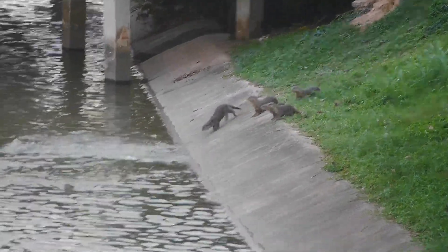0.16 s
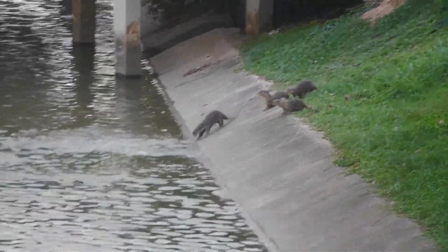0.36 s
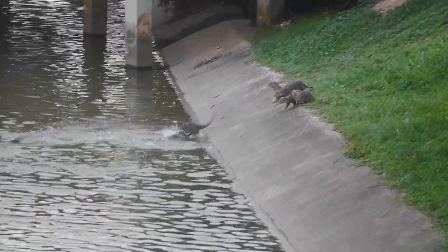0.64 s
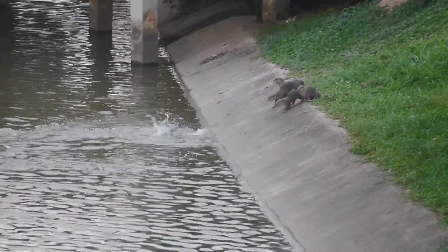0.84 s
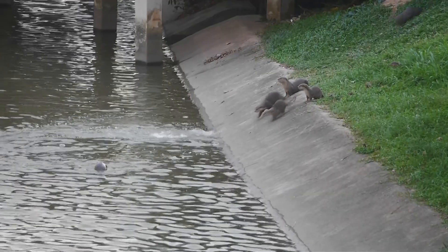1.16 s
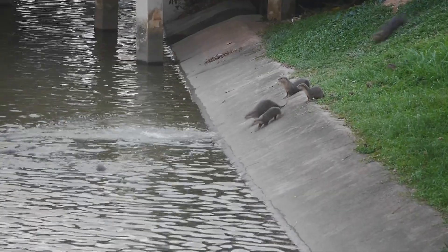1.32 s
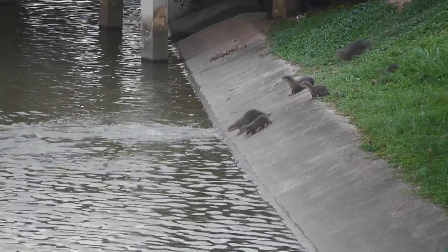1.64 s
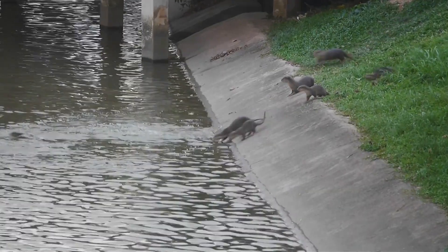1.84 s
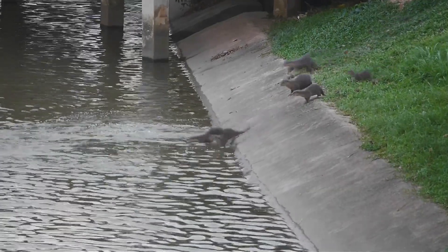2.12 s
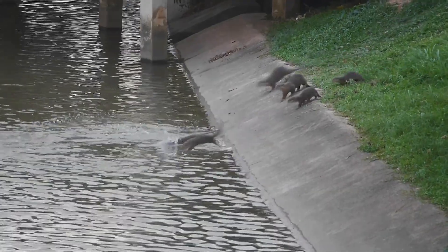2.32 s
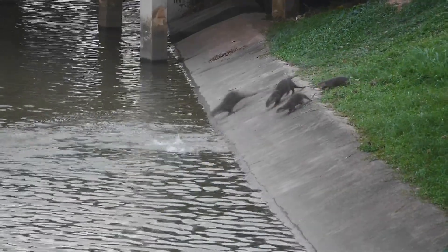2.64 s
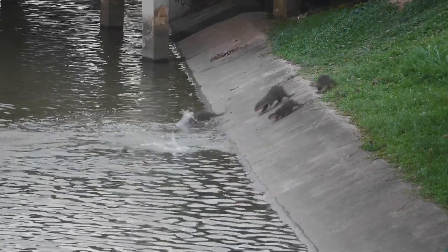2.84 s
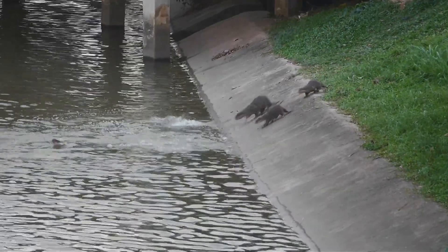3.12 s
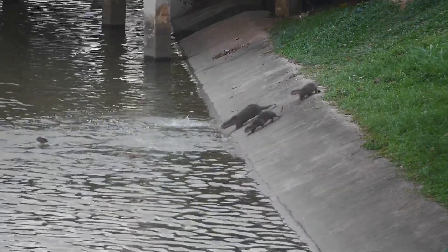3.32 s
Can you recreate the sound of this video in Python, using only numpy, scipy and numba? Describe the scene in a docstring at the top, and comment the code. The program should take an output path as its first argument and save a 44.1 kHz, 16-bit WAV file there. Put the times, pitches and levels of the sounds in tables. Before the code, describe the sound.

Otters squeak in brief, high arched whistles some way off on a canal bank, sparse at first and busier near the end, with slight echo; wind gusts thump the microphone over steady traffic and faint water hiss.

```python
"""Otters squeaking on a canal bank

Otters squeak some way off: thin arched whistles with an octave overtone, made of gliding sine waves, and a short echo.
Shaped noise makes the distant traffic, the fizz of stirred water and a faint rasping insect; short tones make plops.
Gusts of shaped noise buffet two microphone ports, with thumps and crackles in the strongest.
The recorder's gain control turns everything down under loud gusts and recovers slowly."""
import sys
import numpy as np
from scipy import signal
from scipy.fft import rfft, irfft
from scipy.io import wavfile
from scipy.ndimage import uniform_filter1d
from numba import njit

SR = 44100
rng = np.random.default_rng(int(sys.argv[2]) if len(sys.argv) > 2 else 0)


def inscribe(sig):
    """Save sig as 16-bit PCM at rate SR to the path in sys.argv[1].

    A 1-D sig is mono; a 2-D sig holds one channel per row.
    Samples are clipped to [-1, 1] before scaling.
    """
    pcm = np.round(np.clip(np.atleast_2d(sig).T, -1, 1) * 32767)
    wavfile.write(sys.argv[1], SR, pcm.astype(np.int16))


N = 153027  # length in samples

# All levels are set ahead of the recorder's gain control. Spectra give only the shape of a sound.
# Pan is left minus right in dB; phase is how far left leads right, in radians.
# Coherence is the share of power common to both ports, 0-1.

# Traffic spectrum: f/Hz, level/dB
TRAFFIC_SPECTRUM = [(30, -42), (60, -29), (120, -14), (200, -7), (340, -6), (450, -5), (600, -2), (730, 0),
                    (1000, -1.5), (1400, -8), (2000, -14.5), (3000, -24)]
# How alike the traffic is at the two ports: f/Hz, coherence [0-1]
TRAFFIC_COHERENCE = [(100, 0.29), (350, 0.4), (700, 1), (1050, 0.58), (1600, 0.81), (3000, 0.41)]
TRAFFIC_DB, TRAFFIC_PAN_DB, TRAFFIC_PHASE = -24, 1, 0.38

# Stirred water spectrum: f/Hz, level/dB
WATER_SPECTRUM = [(1200, -33), (2800, 0), (4000, -1.5), (6000, -5.5), (7500, -10.5), (8700, -12.5),
                  (9500, -4.5), (10150, -6), (11200, -13.5), (12500, -20), (15500, -29)]
# Rise and fall of the water, before its flicker: t/s, level/dB
WATER_LEVEL = [(0, -41.5), (.35, -40.5), (.7, -43.5), (1.05, -39.5), (1.45, -39.5), (1.9, -43), (2.2, -42),
               (2.45, -40), (2.8, -43), (3.46, -39)]
WATER_PAN_DB, WATER_PHASE, WATER_COHERENCE, WATER_FLICKER_DB = -1.5, 0.78, 0.59, 1.1
# Droplets: average count, mean extra level, level of all droplets against the hiss, decay time
DROPS_PER_S, DROP_SPREAD_DB, DROP_DB, DROP_DECAY_S = 900, 2.2, -9, 0.0005

# Insect rasps: start t/s, length/s
RASPS = [(1.02, .55), (2.02, .48)]
# Insect spectrum: f/Hz, level/dB
INSECT_SPECTRUM = [(11300, -30), (12150, -4), (12400, 0), (12700, -4), (13400, -28)]
INSECT_DB, RASP_FADE_S = -62, 0.06

# Small plops in the canal: start t/s, pitch f/Hz, level/dB before the low cut
PLOPS = [(.330, 780, -6.5), (.336, 800, -10), (1.889, 680, -10)]
PLOP_DECAY_S, PLOP_PHASE, PLOP_LOW_CUT_HZ = 0.0007, 0.5, 350

# Strength of the wind on the ports, before buffeting: t/s, level/dB
GUSTS = [(0.0, -75), (0.1, -52), (0.18, -32), (0.2, -56), (0.34, -38.5), (0.37, -51), (0.45, -30),
         (0.48, -41), (0.54, -25), (0.66, -20), (0.81, -16), (0.82, -27.5), (0.86, -17), (0.95, -21.5),
         (1.05, -39.5), (1.94, -49.5), (1.975, -23), (2.12, -23.5), (2.14, -34), (2.155, -20.5),
         (2.19, -21.5), (2.21, -22), (2.24, -33), (2.27, -21.5), (2.32, -32.5), (2.45, -41), (2.53, -12.5),
         (2.59, -18), (2.81, -17), (2.89, -25.5), (2.91, -19.5), (3.1, -18), (3.18, -32), (3.23, -23.5),
         (3.25, -28.5), (3.32, -18), (3.39, -34), (3.41, -28.5), (3.46, -19)]
BUFFET_DB, BUFFET_RATE_HZ = 1.3, 70
# Phase between the ports for wind: f/Hz, left lead [rad]
WIND_PHASE = [(60, 1.6), (170, 0.84), (340, 1.45), (700, 2.48), (2200, 2.49)]
# Roar spectrum: f/Hz, level/dB
ROAR_SPECTRUM = [(30, -60), (60, -79), (100, -32), (150, -28.5), (260, -9), (400, -0.5), (520, -0.5),
                 (680, -7), (900, -17.5), (1400, -25), (2300, -35.5), (3500, -58)]
# The roar's level is added to the gust strength
ROAR_DB, WIND_PAN_DB, WIND_COHERENCE = 8, 2.5, 0.98
# Light-air rumble spectrum: f/Hz, level/dB
BREEZE_SPECTRUM = [(30, -52), (60, -43), (120, -18), (200, -1), (290, 2.5), (420, -19), (700, -11)]
# Change in the rumble beyond what the gusts give it: t/s, level/dB
RUMBLE_CHANGE = [(0, 0), (.5, 0.5), (.7, -3), (1.05, 0), (1.92, -2.5), (1.97, 6), (2.2, 4.5), (2.45, 0.5),
                 (2.8, -1), (3.46, -2.5)]
# Rough upper band torn off by strong gusts: f/Hz, level/dB
TEAR_SPECTRUM = [(300, -39), (700, 7.5), (1200, -4), (2000, -5.5), (3500, -18), (6000, -54), (15000, -47)]
# Rumble and tear levels apply at this reference gust strength; growth is dB per dB of gust
GUST_REF_DB = -30.5
BREEZE_DB, BREEZE_GROWTH, BREEZE_PAN_DB, BREEZE_COHERENCE = -33, 0.35, 8, 0.19
TEAR_DB, TEAR_GROWTH, TEAR_PAN_DB = -36, 1.25, -1.8
TEAR_ROUGH_DB, TEAR_RATE_HZ = 2.3, 160
# Single eddies that thump the ports: centre t/s, peak level/dB before the treble cut and pan
THUMPS = [(.7155, 0), (1.9595, -7), (1.982, -3), (2.151, 2), (2.204, 2), (2.5348, 3), (2.6247, 9),
          (2.66, -1), (2.7252, 2), (2.905, 1)]
THUMP_HZ, THUMP_TOP_HZ = 520, 3000

# Sharp crackles in the strongest gusts: start t/s, starting level/dB
CRACKLES = [(.547, -19), (.59, -25), (.637, -22), (.783, -22), (.794, -20), (.806, -20), (2.535, -13),
            (2.612, -19), (2.6243, -14), (2.7245, -18)]
# Crackle spectrum: f/Hz, level/dB
CRACKLE_SPECTRUM = [(500, -30), (1200, 0), (2000, -1), (3200, -7), (6000, -20)]
CRACKLE_DECAY_S = 0.0025

# Otter squeaks: start t/s, rise/s, hold/s, fall/s, start f/Hz, top f/Hz, end of hold f/Hz, end f/Hz,
# level/dB (at the top pitch), overtone level/dB (against the whistle, before its fade with pitch),
# swell with pitch [dB per octave], roughness [0-1], echo level/dB (against the squeak)
SQUEAKS = [ (-.04, .02, .025, .045, 5200, 6000, 5950, 4100, -40, -15, 10, .6, -9),
           (.243, .024, .005, .048, 3100, 4400, 4350, 3100, -47, -24, 8, .8, -7),
           (.835, .008, .062, .06, 6600, 6650, 6600, 3800, -41, -14, 14, 1, -6),
           (1.217, .039, .006, .066, 3500, 5550, 5450, 3000, -50, -12, -8, .8, -10),
           (1.575, .062, .002, .05, 6000, 7520, 7480, 6300, -36.5, -22, 42, .8, -7),
           (1.578, .005, .09, .018, 6250, 6280, 6020, 5400, -40.5, -12, 70, .2, -11),
           (1.655, .005, .025, .045, 7300, 7300, 6600, 4000, -45, -4, 3, .8, -9),
           (1.885, .03, .003, .035, 3700, 4900, 4880, 3600, -43, -16, 10, 1, -8),
           (2.42, .03, .012, .025, 4300, 4850, 4830, 4500, -45.5, -19, 12, 1, -9),
           (2.425, .024, .006, .022, 5400, 6100, 6080, 5500, -50.5, -20, 12, .6, -9),
           (2.521, .035, .002, .04, 2900, 4980, 4960, 3200, -32.5, -27, 19, .6, -12),
           (2.538, .021, .003, .028, 2900, 4300, 4280, 2900, -41, -32, 0, .6, -12),
           (2.96, .018, .006, .022, 6100, 6850, 6800, 6400, -42.5, -25, 10, .8, -9),
           (2.987, .005, .04, .066, 6430, 6430, 6330, 3000, -37, -27, 15, 1, -2),
           (3.115, .012, .035, .04, 7000, 7450, 7100, 5900, -46.5, -9, 14, .9, -6),
           (3.148, .037, .005, .032, 5200, 6050, 6020, 3500, -44.5, -22, -5, .9, -10),
           (3.215, .034, .015, .03, 6600, 8250, 8120, 7400, -42.5, -25, 45, .9, -9),
           (3.29, .01, .008, .044, 6700, 6750, 6550, 3800, -51, -14, -8, .9, -10)]
FALL_CURVE = 1.7  # the drop in pitch steepens as this power of time
# Size and rate of the wobbles at full roughness
WAVER_FRACTION, WAVER_RATE_HZ, FLUTTER_DB, FLUTTER_RATE_HZ = 0.014, 600, 3.2, 230
OVERTONE_FADE_DB_PER_KHZ, OVERTONE_REF_HZ = 3.5, 11000  # the overtone weakens as its pitch climbs
ATTACK_S, RELEASE_S = 0.009, 0.01
OTTER_PAN_DB, OTTER_PHASE = -1.4, 0.35
ECHO_T60_S, ECHO_DELAY_S = 0.58, 0.012  # time to sink by 60 dB, wait before the echo

# Gain control: threshold, ratio, how fast it reacts and recovers, loudness it starts from
LIMIT_DB, LIMIT_RATIO, LIMIT_ATTACK_S, LIMIT_RELEASE_S = -25, 1.56, 0.011, 0.49
LIMIT_START_DB = -10.5
TOP_HZ = 15700


def undb(db):
    """Turn decibels into a gain."""
    return 10 ** (np.asarray(db) / 20)


def unit(x):
    """Scale to an rms (average strength) of 1."""
    return x / np.sqrt(np.mean(x ** 2))


def curve(rows):
    """Join (s, value) rows by straight lines."""
    return np.interp(np.arange(N) / SR, *np.array(rows, float).T)


def by_hz(rows):
    """Join (Hz, value) rows along a log-frequency axis."""
    hz, value = np.array(rows, float).T
    return np.interp(np.log(np.fft.rfftfreq(N, 1 / SR) + 1), np.log(hz + 1), value)


def colour(x, rows):
    """Shape a sound by a spectrum, falling steeply above its last point; rms 1."""
    above = np.maximum(np.fft.rfftfreq(N, 1 / SR) / rows[-1][0], 1)
    gain = undb(by_hz(rows)) / above ** 4
    return unit(irfft(rfft(x) * gain, N))


def walk(rate_hz):
    """Random wander of rms 1, made by smoothing noise twice; a higher rate is quicker."""
    k = max(int(SR / rate_hz), 1)
    return unit(uniform_filter1d(uniform_filter1d(rng.standard_normal(N), k), k))


def noise_pair(coherence):
    """Left and right noise that share a part."""
    shared, left, right = rfft(rng.standard_normal((3, N)))
    c = np.clip(coherence, 0, 1)
    return irfft(np.sqrt(c) * shared + np.sqrt(1 - c) * np.array([left, right]), N)


def ports(x, pan_db, phase):
    """Set the level and phase difference between the two microphone ports."""
    side = np.array([[0.5], [-0.5]])
    return irfft(rfft(x) * undb(side * pan_db) * np.exp(1j * side * phase), N)


@njit
def follow(x, attack, release, e):
    """Follow loudness with separate rising and sinking speeds, starting from e."""
    out = np.empty(len(x))
    for i in range(len(x)):
        e += (x[i] - e) * (attack if x[i] > e else release)
        out[i] = e
    return out


def traffic():
    """Far roads blend into a steady roar that wavers only slightly."""
    roar = colour(noise_pair(by_hz(TRAFFIC_COHERENCE)), TRAFFIC_SPECTRUM)
    swell = undb(0.35 * walk(7))
    return ports(roar, TRAFFIC_PAN_DB, TRAFFIC_PHASE) * undb(TRAFFIC_DB) * swell


def water():
    """Stirred water hisses as steady noise, with droplets as tiny fading noise bursts."""
    t = np.arange(N) / SR
    hiss = colour(noise_pair(WATER_COHERENCE), WATER_SPECTRUM)
    falls = rng.random(N) < DROPS_PER_S / SR
    extra_db = DROP_SPREAD_DB * np.minimum(rng.exponential(size=N), 5)
    ticks = falls * undb(extra_db) * rng.standard_normal(N)
    burst = rng.standard_normal(N) * np.exp(-t / DROP_DECAY_S)
    drops = colour(signal.fftconvolve(ticks, burst)[:N], WATER_SPECTRUM)
    stirred = ports(hiss + undb(DROP_DB) * drops, WATER_PAN_DB, WATER_PHASE)
    return stirred * undb(curve(WATER_LEVEL) + WATER_FLICKER_DB * walk(18))


def insect():
    """A thin rasp of very high, narrow noise fades in and out."""
    t = np.arange(N) / SR
    singing = np.zeros(N)
    for start, length in RASPS:
        from_nearest_end = np.minimum(t - start, start + length - t)
        singing += np.clip(from_nearest_end / RASP_FADE_S, 0, 1)
    return colour(noise_pair(0.5), INSECT_SPECTRUM) * singing * undb(INSECT_DB)


def plops():
    """Each plop is a short sine tone that dies away within milliseconds."""
    out = np.zeros(N)
    for start, hz, db in PLOPS:
        u = np.maximum(np.arange(N) / SR - start, 0)
        fade = (1 + u / PLOP_DECAY_S) * np.exp(-u / PLOP_DECAY_S)
        out += undb(db) * np.sin(2 * np.pi * hz * u) * fade
    low_cut = signal.butter(2, PLOP_LOW_CUT_HZ, "high", fs=SR, output="sos")
    return ports(signal.sosfilt(low_cut, out), 0, PLOP_PHASE)


def eddy_thumps():
    """Each eddy gives one smooth pressure dip with a small rise on both sides."""
    out = np.zeros(N)
    for centre, db in THUMPS:
        u = 2 * np.pi * THUMP_HZ * np.abs(np.arange(N) / SR - centre)
        out -= undb(db) * (1 - u) * np.exp(-u)
    return signal.sosfilt(signal.butter(2, THUMP_TOP_HZ, fs=SR, output="sos"), out)


def wind():
    """Light air rumbles low; gusts roar in the ports, and the strongest tear and thump."""
    gust_db = curve(GUSTS) + BUFFET_DB * walk(BUFFET_RATE_HZ)
    over_ref_db = gust_db - GUST_REF_DB
    breeze_db = BREEZE_DB + curve(RUMBLE_CHANGE) + BREEZE_GROWTH * over_ref_db
    breeze = colour(noise_pair(BREEZE_COHERENCE), BREEZE_SPECTRUM) * undb(breeze_db)
    roar = colour(noise_pair(WIND_COHERENCE), ROAR_SPECTRUM) * undb(gust_db + ROAR_DB)
    tear_db = TEAR_DB + TEAR_GROWTH * over_ref_db + TEAR_ROUGH_DB * walk(TEAR_RATE_HZ)
    tear = colour(noise_pair(WIND_COHERENCE), TEAR_SPECTRUM) * undb(tear_db)
    phase = by_hz(WIND_PHASE)
    low = ports(breeze, BREEZE_PAN_DB, phase)
    middle = ports(roar + eddy_thumps(), WIND_PAN_DB, phase)
    return low + middle + ports(tear, TEAR_PAN_DB, phase)


def crackles():
    """Torn air at the ports makes noise bursts that start at once and die very quickly."""
    t = np.arange(N) / SR
    bursts = np.zeros(N)
    for start, db in CRACKLES:
        bursts += undb(db) * (t >= start) * np.exp(-np.abs(t - start) / CRACKLE_DECAY_S)
    noise = colour(rng.standard_normal(N), CRACKLE_SPECTRUM)
    return ports(noise * bursts, 0, by_hz(WIND_PHASE))


def bank_echo(sent):
    """The banks return a spray of reflections, modelled as noise that dies away."""
    t = np.arange(N) / SR
    fade = np.exp(-np.log(1000) * t / ECHO_T60_S) * (t > ECHO_DELAY_S)
    tail = rng.standard_normal((2, N)) * fade
    return signal.fftconvolve(sent[None], unit(tail) / np.sqrt(N), axes=1)[:, :N]


def otters():
    """Each squeak's pitch moves to a top, holds and drops away, some clean and some rough."""
    t, voice, sent = np.arange(N) / SR, np.zeros(N), np.zeros(N)
    for (start, rise, hold, fall, from_hz, top_hz, held_hz, end_hz,
         db, overtone_db, swell_db, rough, echo_db) in SQUEAKS:
        waver, flutter = rough * walk(WAVER_RATE_HZ), rough * walk(FLUTTER_RATE_HZ)
        length = rise + hold + fall
        on = (t >= start) & (t < start + length)
        u = t[on] - start
        hz = (top_hz + (from_hz - top_hz) * np.clip(1 - u / rise, 0, 1) ** 2
              + (held_hz - top_hz) * np.clip((u - rise) / hold, 0, 1)
              + (end_hz - held_hz) * np.clip((u - rise - hold) / fall, 0, 1) ** FALL_CURVE)
        # Adding up the pitch over time gives the position within the wave
        phase = 2 * np.pi * np.cumsum(hz * (1 + WAVER_FRACTION * waver[on])) / SR
        envelope = np.clip(u / ATTACK_S, 0, 1) * np.clip((length - u) / RELEASE_S, 0, 1)
        whistle = undb(swell_db * np.log2(hz / top_hz)) * np.sin(phase)
        overtone_fade_db = OVERTONE_FADE_DB_PER_KHZ * (2 * hz - OVERTONE_REF_HZ) / 1000
        overtone = undb(overtone_db - overtone_fade_db) * np.sin(2 * phase)
        level = np.sqrt(2) * undb(db + FLUTTER_DB * flutter[on])  # root 2: level is rms
        squeak = envelope * level * (whistle + overtone)
        voice[on] += squeak
        sent[on] += undb(echo_db) * squeak
    return ports(voice, OTTER_PAN_DB, OTTER_PHASE) + bank_echo(sent)


def scene():
    """Add the otters, wind, crackles, traffic, water, plops and insect together."""
    return otters() + wind() + crackles() + traffic() + water() + plops() + insect()


def record(dry):
    """Gain control ducks loud moments and recovers slowly; then the top is cut."""
    peak = np.abs(dry).max(axis=0)  # the louder port steers both
    attack, release = 1 / (LIMIT_ATTACK_S * SR), 1 / (LIMIT_RELEASE_S * SR)
    loudness = follow(peak, attack, release, float(undb(LIMIT_START_DB)))
    gain = np.maximum(loudness / undb(LIMIT_DB), 1) ** (1 / LIMIT_RATIO - 1)
    top_cut = signal.ellip(10, 0.2, 80, TOP_HZ, fs=SR, output="sos")
    return signal.sosfilt(top_cut, dry * gain)


dry = scene()
out = record(dry)
inscribe(out)
```